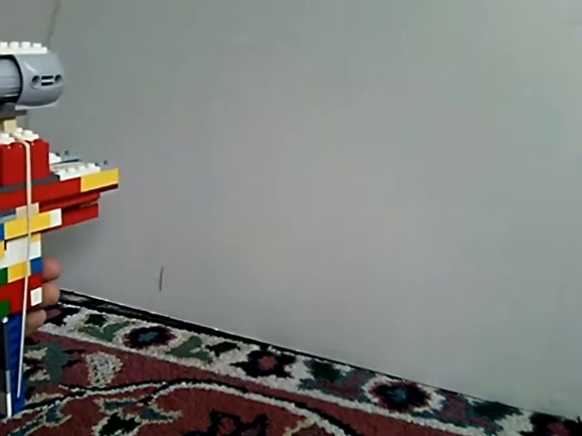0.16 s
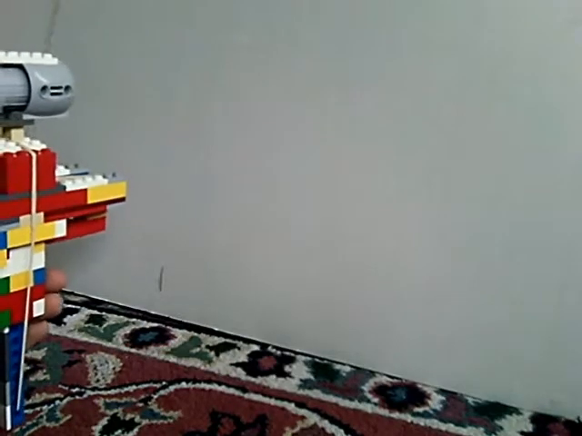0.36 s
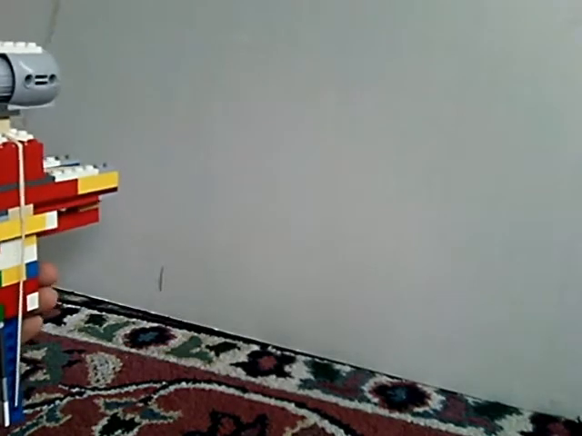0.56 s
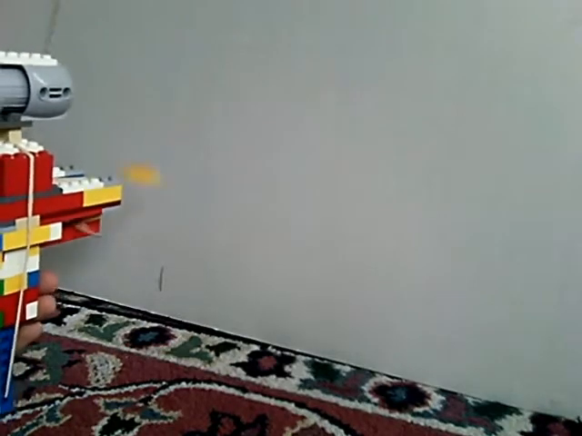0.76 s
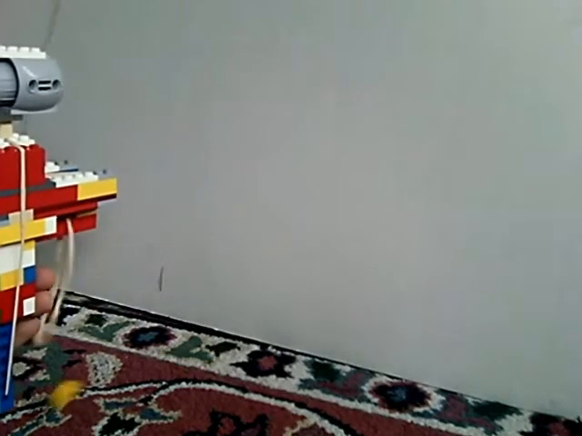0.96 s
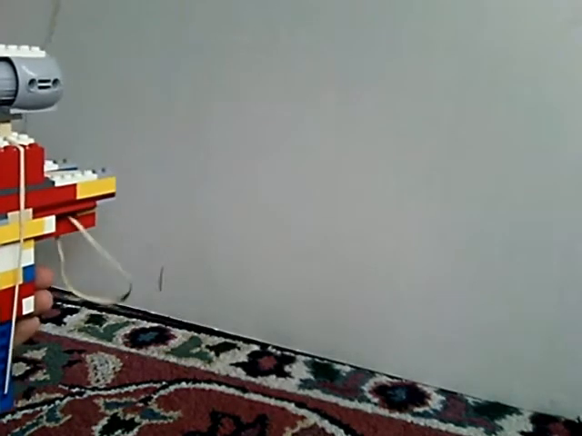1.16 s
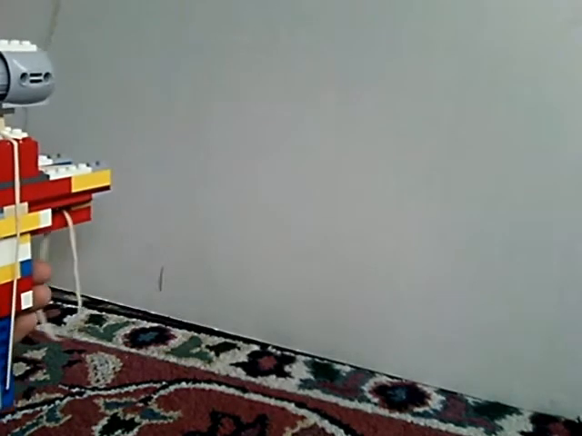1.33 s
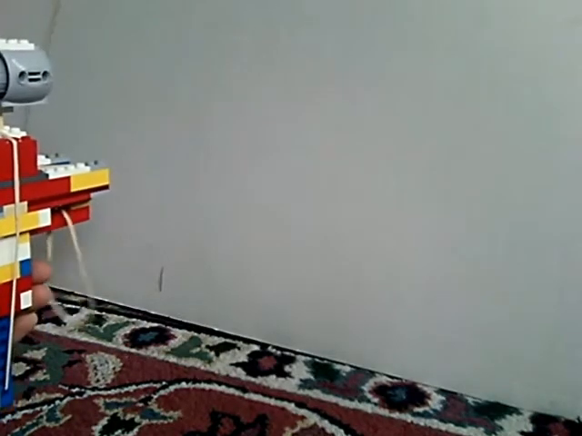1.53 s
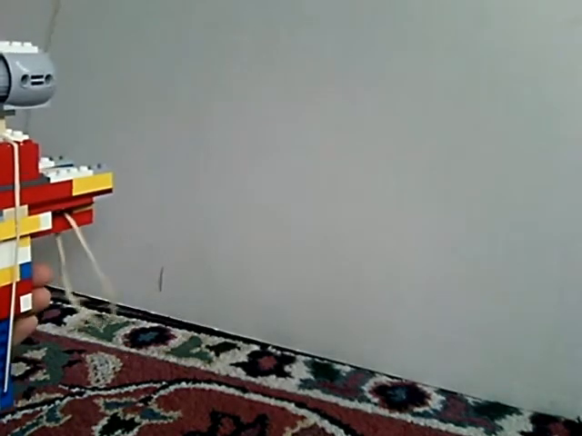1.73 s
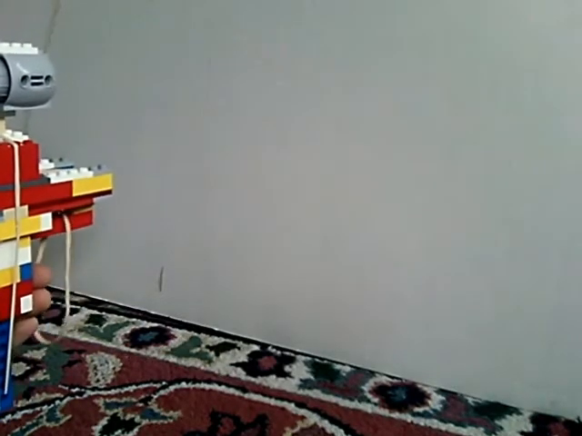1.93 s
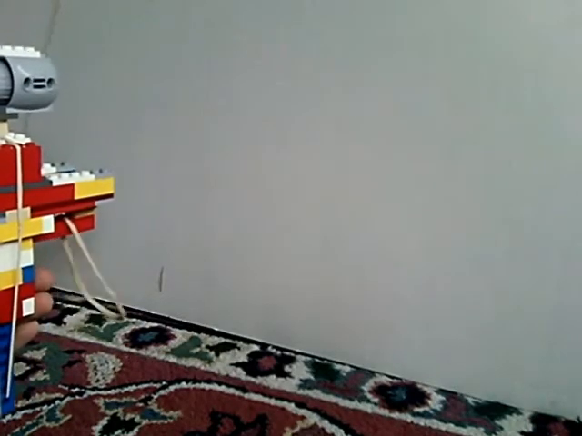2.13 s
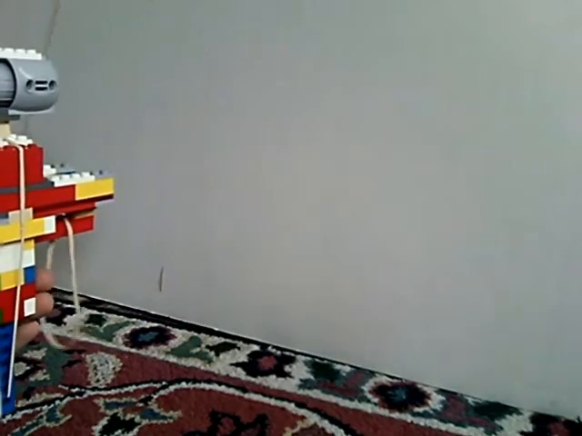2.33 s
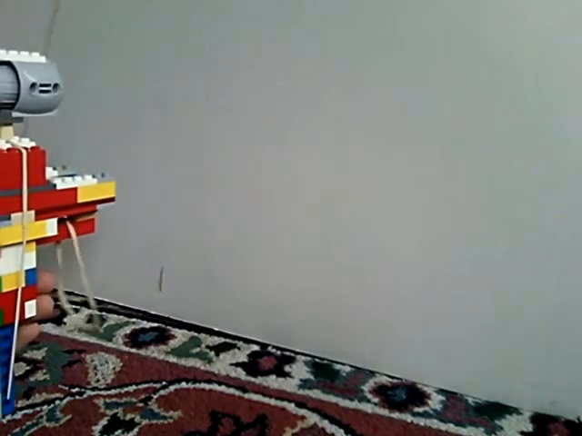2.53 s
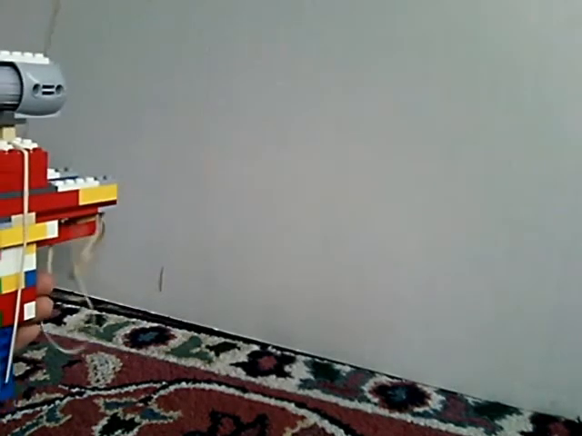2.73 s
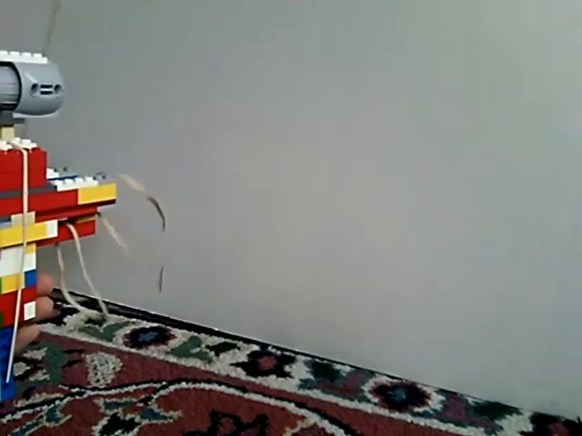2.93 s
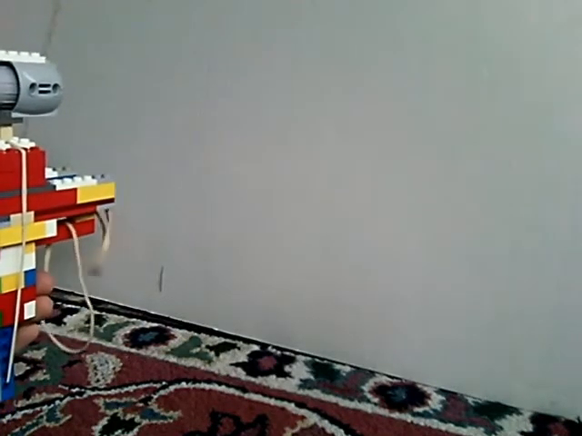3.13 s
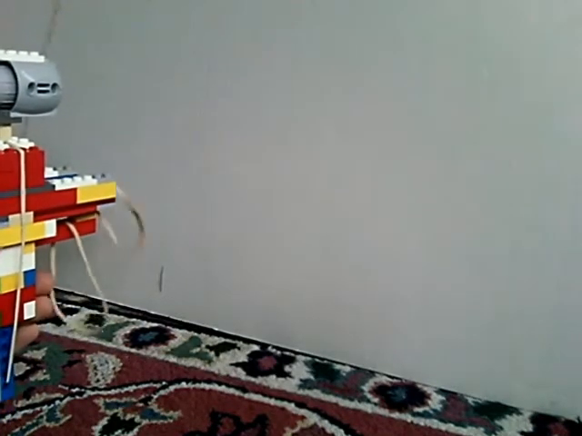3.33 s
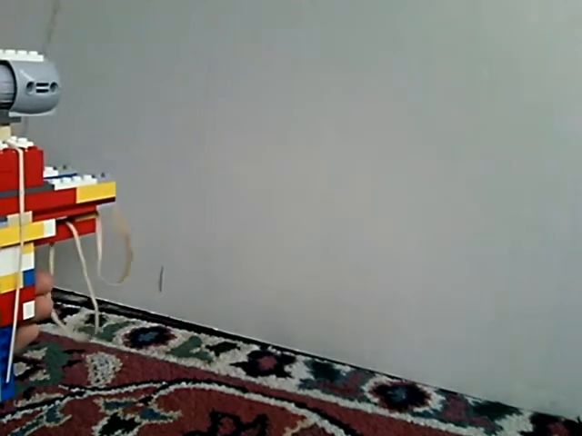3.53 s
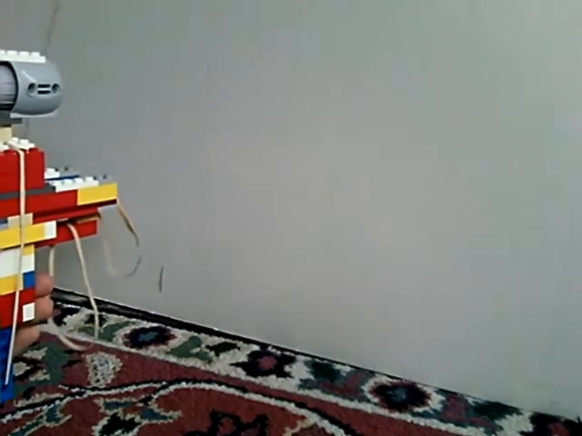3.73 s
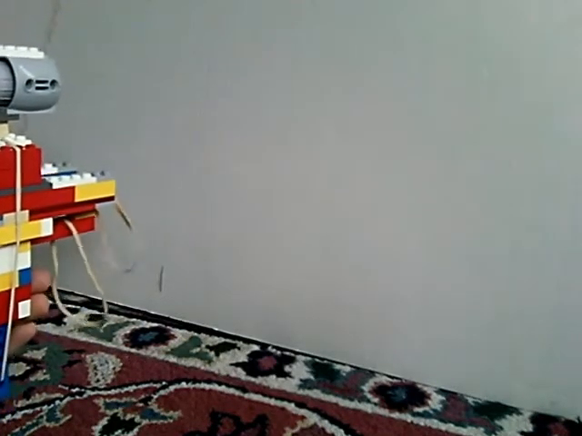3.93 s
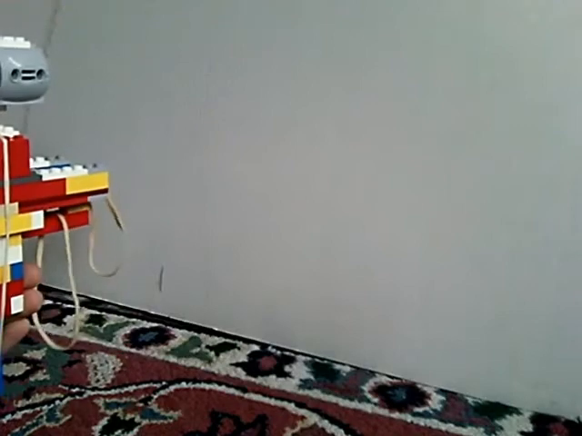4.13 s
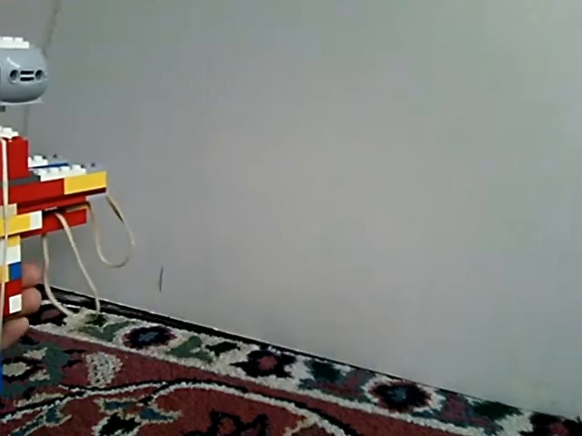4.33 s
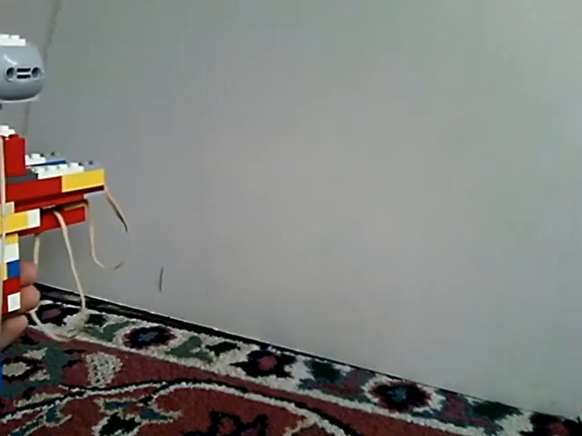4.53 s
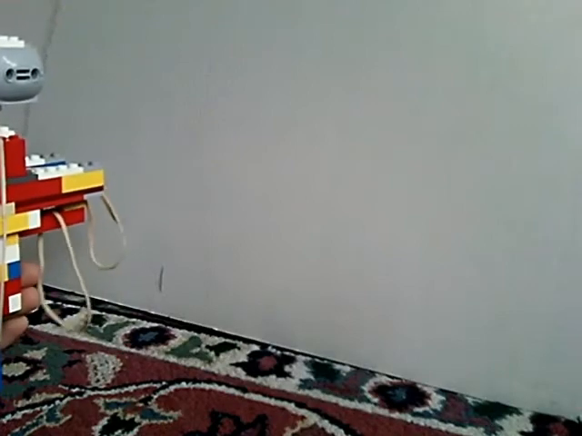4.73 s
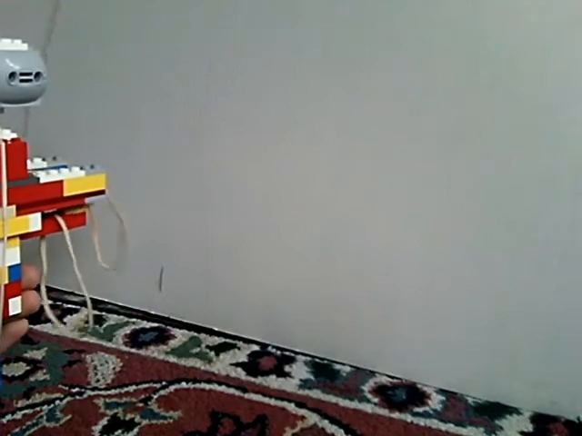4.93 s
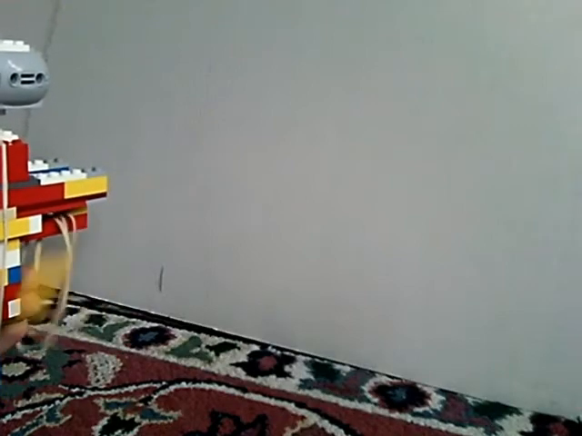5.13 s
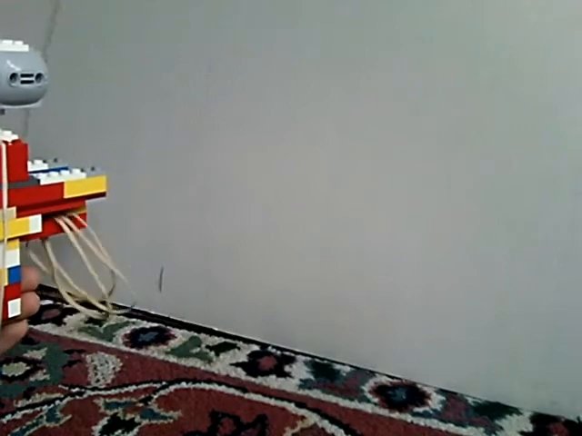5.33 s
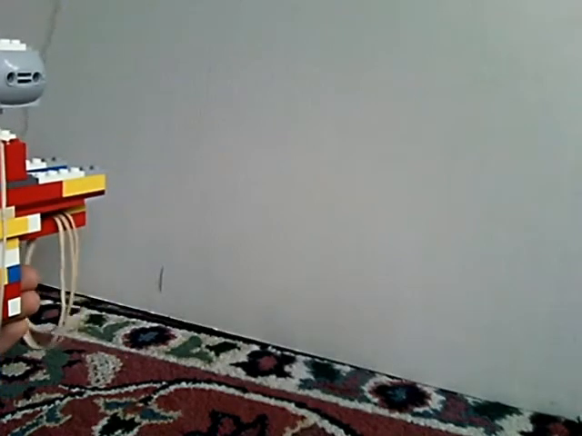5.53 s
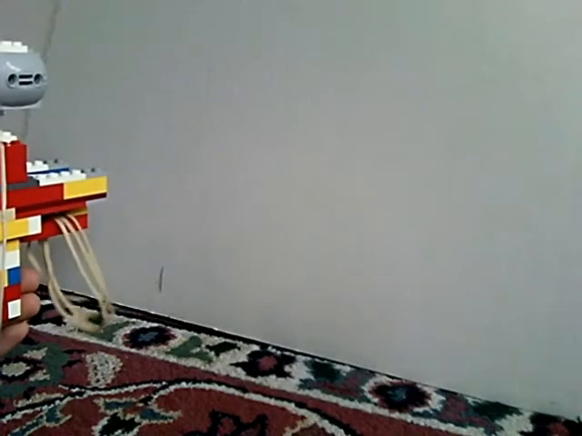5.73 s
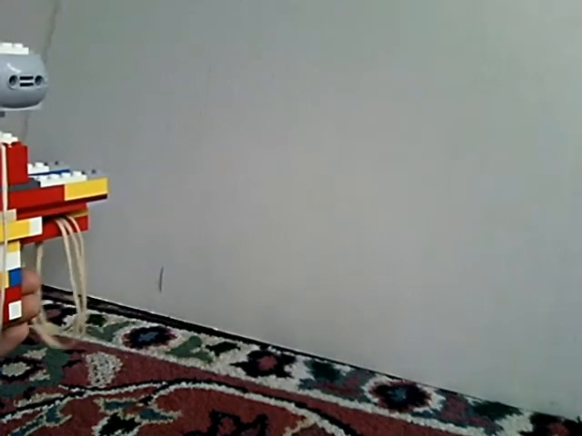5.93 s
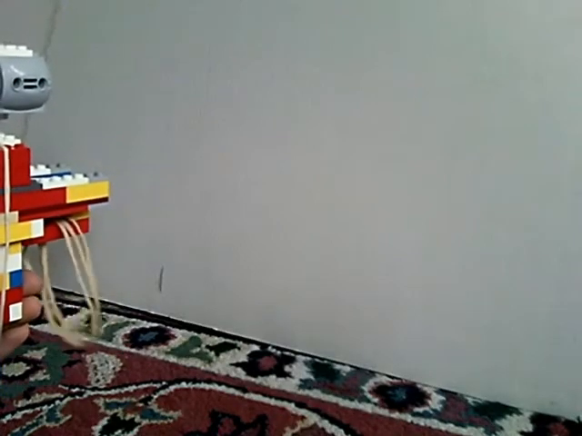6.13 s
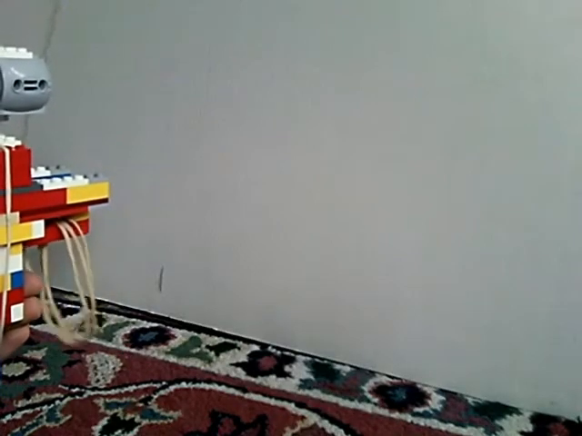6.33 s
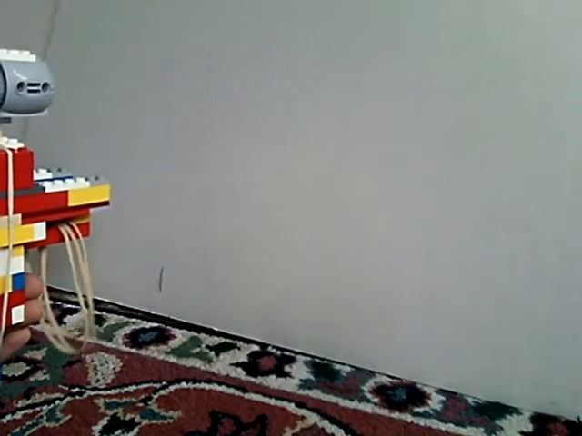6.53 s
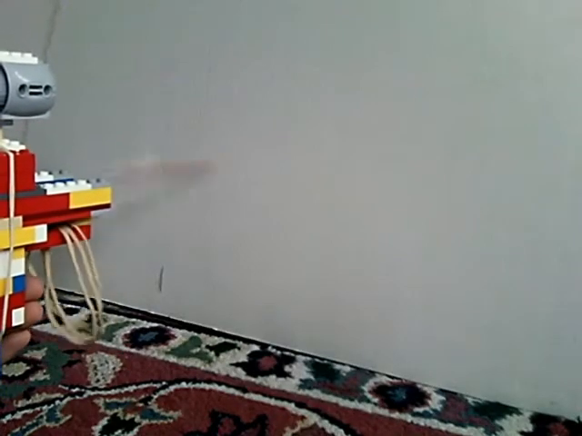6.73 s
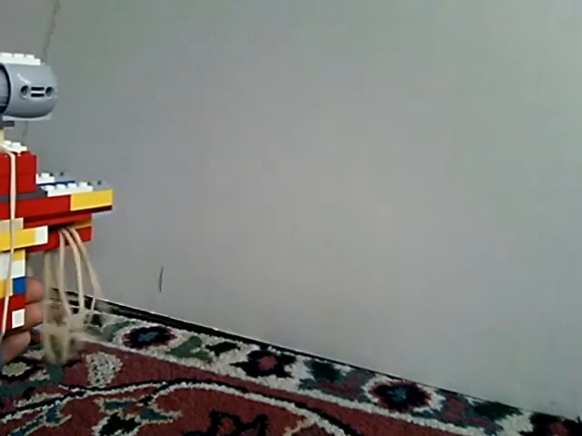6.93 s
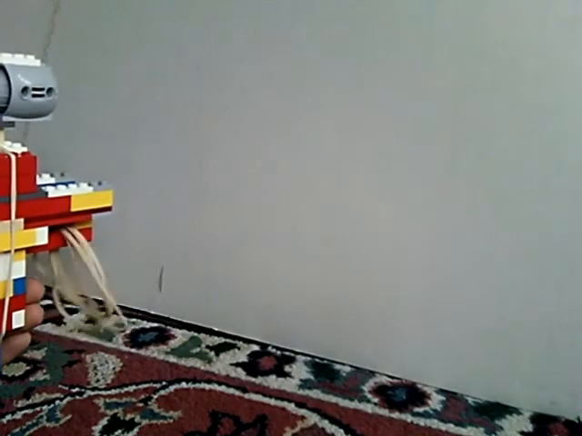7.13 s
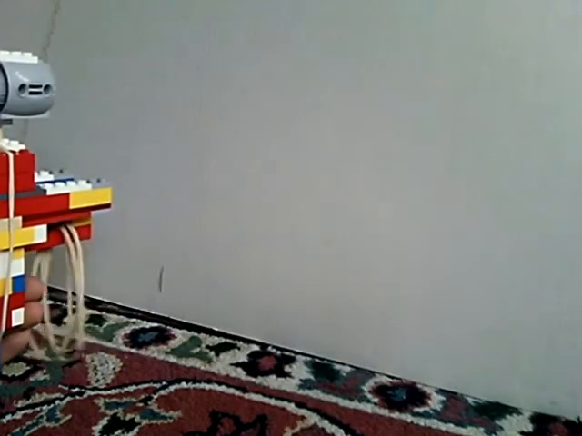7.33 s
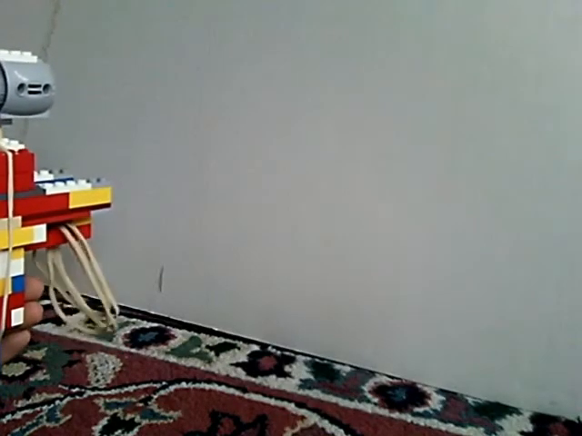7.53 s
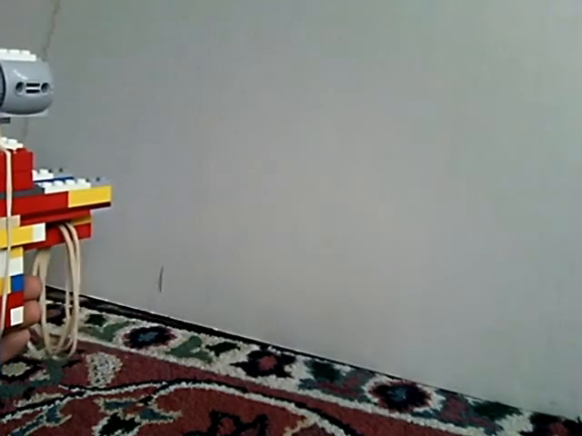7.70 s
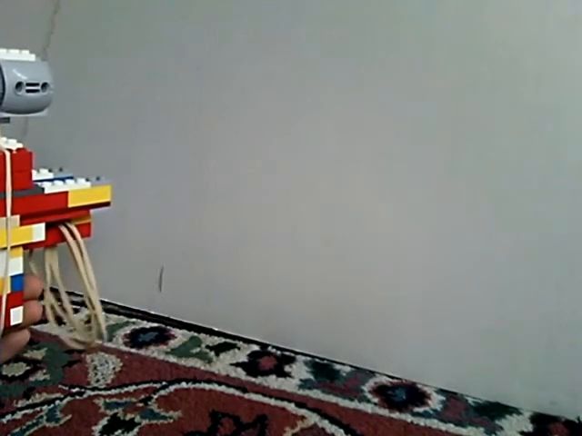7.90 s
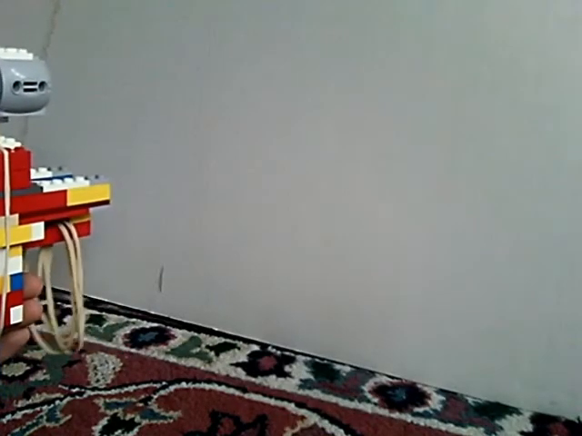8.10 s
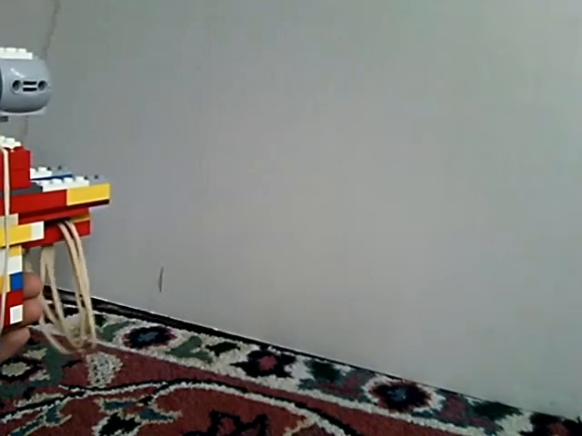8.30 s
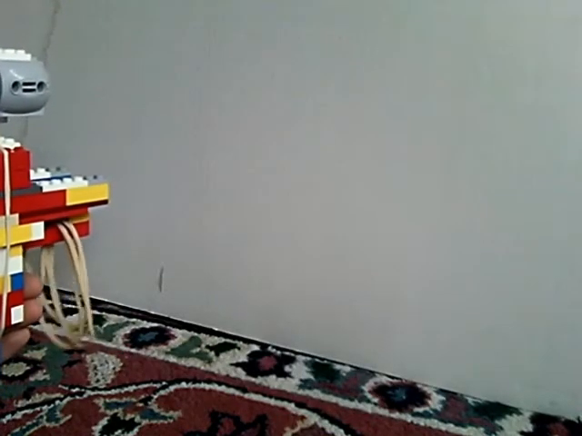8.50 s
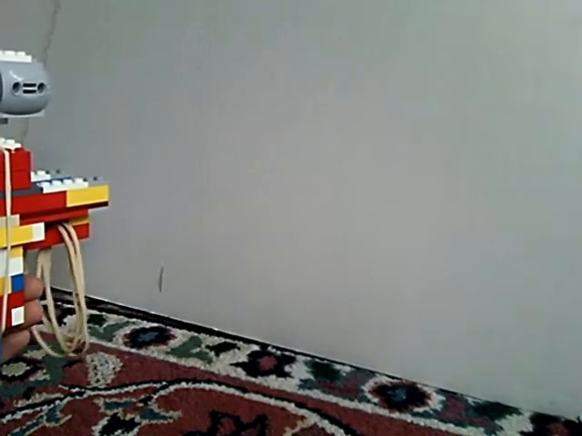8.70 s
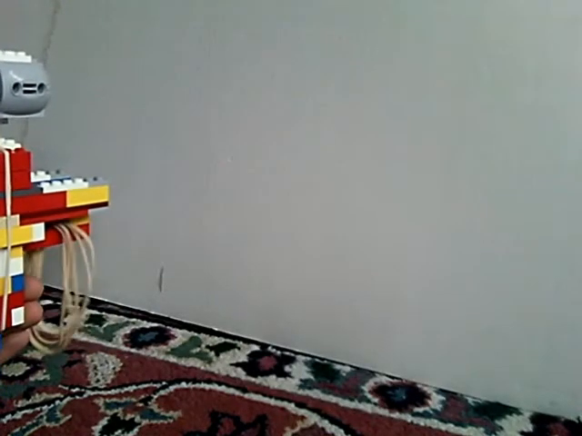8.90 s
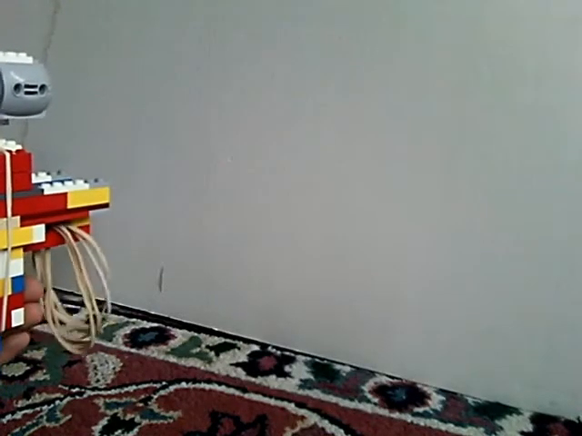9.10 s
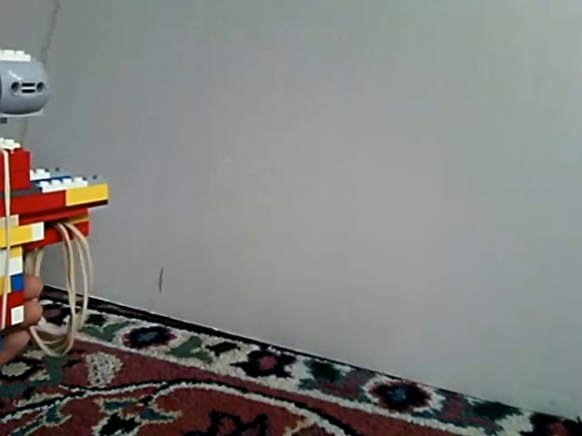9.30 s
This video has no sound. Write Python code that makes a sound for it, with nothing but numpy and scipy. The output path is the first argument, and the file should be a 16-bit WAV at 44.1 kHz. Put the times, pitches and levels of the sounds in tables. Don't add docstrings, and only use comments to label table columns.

```python
import sys
import numpy as np
from scipy import signal
from scipy.fft import rfft, irfft
from scipy.io import wavfile
from scipy.ndimage import uniform_filter1d

SR = 44100
rng = np.random.default_rng(int(sys.argv[2]) if len(sys.argv) > 2 else 0)


def boost(x):
    u = np.asarray(x, float) / 20
    return 10 ** u


def dump_mix(stems):
    frames = np.atleast_2d(stems).T
    limited = np.clip(frames, -1, 1)
    pcm = np.round(limited * 32767).astype(np.int16)
    wavfile.write(sys.argv[1], SR, pcm)


N = 417186

# frequency in Hz, level in dB, decay time t60 in seconds.
GUN_MODES = [(690, -16.5, 0.0086), (957, -20, 0.0059), (1406, -16, 0.012), (1680, -10, 0.0051),
             (2100, -3, 0.0049), (2756, -3.5, 0.0038), (3440, -2, 0.0023), (4200, -4.5, 0.0026),
             (5340, -9, 0.0033), (6160, -9, 0.0028), (7900, -11, 0.0028), (9920, -11.5, 0.0019)]
# release in seconds, strength in dB,
# time to the muzzle in seconds, whip of the band in dB.
SHOTS = [
    (0.6353, -1, .0203, -0.5),
    (2.505, -0.5, 0.016, -2),
    (4.883, -1, .0203, 1.5),
    (6.675, -1.5, .02, -3),
    (8.641, -3, 0.021, -6),
]
# delay as a share of the time to the muzzle, level in dB, # added ring in
# Hz, chatter t60 in seconds.
SHOT_STEPS = [
    (-.18, -9, 2020, 0.06),
    (0, 0, 2280, 0.031),
    (0.279, -7, 3940, 0.079),
    (.5, -2, 4200, 0.039),
    (0.752, -10.5, 3220, 0.0097),
    (1., -2, 2770, 0.035),
    (1.2, -4, 2130, 0.027),
    (1.599, -5, 2440, 0.012),
    (1.9, -3.5, 3910, .03),
    (2.4, -16, 3250, 0.064),
]


def barrel_rattle():
    share, db, hz, t60 = np.transpose(SHOT_STEPS)
    luck_db = 3.5 * rng.standard_normal((len(SHOTS), len(share)))
    rows = []
    for (s, strength_db, barrel_s, whip_db), luck in zip(SHOTS, luck_db):
        whip = whip_db * (share > 1.4)
        rows += unfold(s, share * barrel_s, db + strength_db + whip + luck, hz, t60)
    return boost(-3.0) * plastic_clicks(rows, GUN_MODES, -6.5, 0.0064, cut_hz=910)


# frequency in Hz, level in dB, t60 in seconds.
WALL_MODES = [(172.7, -15, 0.19), (231.4, -15, 0.11), (318.3, -6.5, 0.11), (386.5, -2, 0.065),
              (407, 1, 0.024), (507, -3.5, 0.093), (564.2, -9, 0.081), (646, 5, 0.016),
              (732.7, -4.5, 0.082), (740, 4.5, 0.031), (793, 4, 0.02), (957, -7, 0.011), (1028, 0, 0.035),
              (1124, -10.5, 0.16), (1251, -11, 0.069), (1453, -3, 0.031), (1700, -10, 0.024),
              (1900, -3, 0.029), (2350, -1.5, 0.016), (3050, -11, 0.005)]
# frequency in Hz, level in dB, t60 in seconds.
BRICK_MODES = [(290, -20.5, 0.067), (616, -20, 0.052), (900, -7, 0.0067), (1546, -10.5, 0.023),
               (1900, -2, 0.0078), (2610, -8, 0.01), (3130, -6.5, 0.0037), (4530, -10.5, 0.005),
               (6030, -13, 0.0054), (6900, -14.5, 0.0024), (9300, -14.5, 0.0018)]
# start in seconds, peak in dB, crack in dB, push of air in dB,
# second touch in dB.
THUMPS = [
    (0.7548, 1, -6, -35, -27),
    (2.5387, 10.5, -5, -2.5, 0),
    (4.9524, 4.5, -1, -19, -8),
    (6.7092, 10, 0, 0, 3),
    (8.671, 8, 0, 1, 4),
]


def wall_thumps():
    boom, crack, push = np.zeros((2, N)), np.zeros((2, N)), np.zeros(N)
    hard_db, hard_t60, chatter_per_db = 9.5, 0.0076, 0.9
    middle_hz, dull_db_per_octave = 627, 1.1
    for s, db, crack_db, push_db, second_db in THUMPS:
        soft_db = max(hard_db - db, 0)
        dulling = dull_db_per_octave * soft_db
        modes = [(hz, d - dulling * abs(np.log2(hz / middle_hz)), t60) for hz, d, t60 in WALL_MODES]
        chatter_t60 = hard_t60 * boost(-chatter_per_db * soft_db)
        strike(*boom, s, modes, db, chatter_t60, detune=0.011, spread_db=1, blur=0.23)
        strike(*crack, s, BRICK_MODES, crack_db, 0.0079)
        second_s = s + .0142
        strike(*boom, second_s, modes, second_db, 0.016, detune=0.011, spread_db=-0.5, blur=0.17)
        strike(*crack, second_s, BRICK_MODES, second_db + 0.5 - 2 * soft_db, 0.0065)
        add(push, s, boost(push_db) * ring([(19.4, 0.96, 0.15)]))
    return low_cut(low_cut(boom, 122), 122), crack, push


# start in seconds, strength in dB, loudest ring in Hz.
TRIGGER_SNAPS = [
    (1.6254, -5, 2282),
    (3.9929, -6.5, 2205),
    (5.7302, -6, 2210),
    (7.9217, -7, 2100),
]
# delay in seconds, level in dB, share of the ring frequency,
# chatter t60 in seconds.
TRIGGER_STEPS = [
    (-.006, -31, 0.78, .03),
    (-.003, -11, 1.034, 0.09),
    (0, 0, 1., .018),
    (.0036, -2, 0.933, 0.0094),
]


def trigger_snaps():
    delay, db, share, t60 = np.transpose(TRIGGER_STEPS)
    rows = []
    for s, strength_db, hz in TRIGGER_SNAPS:
        rows += unfold(s, delay, db + strength_db, share * hz, t60)
    snaps = plastic_clicks(rows, GUN_MODES, -1.056, 0.007, cut_hz=520)
    return boost(3.5) * signal.lfilter(*signal.butter(1, 6000, fs=SR), snaps)


# start in seconds, peak in dB, loudest ring in Hz, chatter t60 in seconds.
BOUNCES = [(5.1825, -29, 1820, .01), (5.185, 3, 1430, 0.019), (5.188, -4, 1900, 0.012),
           (5.194, -7, 700, 0.021), (5.2, -9.5, 2270, 0.023), (5.2365, -2, 1470, 0.013),
           (5.24, -5.5, 1900, 0.01), (5.2445, -10, 900, 0.026), (5.25, -20, 2600, 0.015),
           (5.298, -34, 300, 0.01)]


def near_bounces():
    return plastic_clicks(BOUNCES, BRICK_MODES, -2.5, 0.015, cut_hz=44)


# start in seconds, peak in dB, loudest ring in Hz,
# chatter t60 in seconds.
LANDINGS = [
    (3.0865, -16, 3190, 0.031),
    (3.09, -15.5, 1760, 0.012),
    (3.104, -23.5, 1610, .01),
    (7.34, -13, 3127, 0.019),
    (7.343, -15, 2060, 0.0039),
    (7.355, -22, 4070, 0.057),
]


def far_landings():
    return plastic_clicks(LANDINGS, BRICK_MODES, 0, 0.0092, cut_hz=700)


# start in seconds, peak in dB, ring in Hz, t60 in seconds.
KNOCKS = [(3.196, -27.5, 320, .04), (3.216, -34, 230, 0.036), (4.135, -42, 560, 0.055),
          (5.19, -27.5, 120, .06), (1.702, -40, 170, .03), (5.4168, -34.5, 520, 0.016),
          (9.198, -30, 250, 0.045), (9.197, -35, 830, .015)]


def knocks_and_jolts():
    out = np.zeros((2, N))
    taps = list(KNOCKS)
    for s, db, barrel_s, _ in SHOTS:
        for late in (0, barrel_s):
            taps.append((s + late, db - 26, 384, 0.044))
    for s, db, hz, t60 in taps:
        strike(*out, s, [(hz, 0, t60), (2.0 * hz, -9, t60 / 2)], db, 0.0057, detune=0)
    return out


# start in seconds, length in seconds,
# centre in Hz, width in Hz, level in dB.
HOLLOWS = [(5.195, .045, 1520, 80, -37), (5.245, 0.08, 1545, 44, -30.5), (5.74, 0.079, 1400, 60, -44),
           (1.645, 0.069, 1350, 110, -46), (5.745, .05, 3300, 150, -41), (4.005, .068, 1347, 100, -45),
           (3.1, .07, 3250, 150, -48)]
# start in seconds, length in seconds, centre in Hz,
# width in Hz, level in dB.
RUBS = [(1.09, .11, 2500, 1000, -56), (3.3, 0.46, 1950, 1200, -61), (9.1, 0.54, 1620, 220, -56.5),
        (.12, 0.21, 900, 1000, -57.5)]


def rubs_and_hollows():
    out = np.zeros(N)
    for s, length, hz, width_hz, db in list(RUBS) + list(HOLLOWS):
        size = round(length * SR)
        add(out, s, boost(db) * fuzz(hz, width_hz, size) * signal.windows.tukey(size, .5))
    return out


def outside():
    t = np.arange(N) / SR
    hum_hz, hum_db = 121, -55.5
    rumble_db = -45.5 + 15 * np.exp(-t / 0.18) - 1.65 * t
    drift_db = 3 * fuzz(0.23, 1.7, N)
    rumble = boost(rumble_db + drift_db) * fuzz(23.6, 21, N)
    near = 1 / (1 + np.exp(np.minimum((t - 0.45) / 0.076, 50)))
    drone = boost(hum_db + 16) * near * np.sin(2 * np.pi * hum_hz * t)
    hums = boost(hum_db) * fuzz(hum_hz, 3.6, N) + boost(-58.5) * fuzz(177.9, 3.6, N)
    return rumble + drone + hums


# frequency in Hz, density in dB per Hz.
FLOOR_SPECTRUM = [(12, -30), (20, -2), (124, -4), (141, -30), (174, -1), (204, -18.5), (233, -6.5),
                  (312, -15), (355, -11), (395, -14.5), (557, -15), (706, -18), (1400, -21), (2080, -28),
                  (11000, -34), (14300, -15.5), (22000, -120)]


def noise_floor():
    frames, hz = N // 512 + 5, np.fft.rfftfreq(2048, 1 / SR)
    a, b, patches = rng.standard_normal((frames, 1025, 3)).T
    patches = evened(uniform_filter1d(uniform_filter1d(patches, 10, 0), 8, 1))
    z = (a + 1j * b) * boost(read(FLOOR_SPECTRUM, hz)[:, None] + 1.7 * patches)
    return boost(-43) * evened(signal.istft(z, nperseg=2048, noverlap=1536)[1][:N])


# frequency in Hz, t60 in seconds.
ROOM_DECAY = [(150, 0.27), (500, 0.35), (1400, 0.35), (3500, 0.27), (6000, 0.26), (9000, 0.14)]


def room(x, far_s=0.064, far_db=-6):
    taps = np.zeros(SR // 2)
    at = np.arange(200, len(taps) - 20, 20)
    taps[at + rng.integers(0, 20, len(at))] = rng.choice([-1., 1.], len(at))
    hz, t, z = signal.stft(taps, SR, nperseg=256)
    thinning_db = far_db * np.clip((t - far_s) / 0.015, 0, 1)
    decay_db = -60 * t / read(ROOM_DECAY, hz)[:, None]
    tail = signal.istft(z * boost(decay_db + thinning_db), SR, nperseg=256)[1]
    return signal.fftconvolve(x, tail / np.linalg.norm(tail))[:N]


def unfold(start, delays, db, hz, chatter_t60):
    return list(zip(start + delays, db, hz, chatter_t60))


def plastic_clicks(table, modes, main_db, main_t60, cut_hz):
    out = np.zeros((2, N))
    for s, db, hz, chatter_t60 in table:
        body = sorted(list(modes) + [(hz, main_db, main_t60)])
        strike(*out, s - .0004, body, db, chatter_t60)
    return low_cut(out, cut_hz)


def strike(direct, spread, s, modes, db, chatter_t60, detune=0.046, spread_db=2, blur=0.5):
    luck = rng.standard_normal((len(modes), 2))
    body = ring([(hz * (1 + detune * a), d + spread_db * b, t60)
                 for (hz, d, t60), (a, b) in zip(modes, luck)])
    sound = signal.fftconvolve(spray(chatter_t60), body)
    sound *= boost(db) / abs(sound).max()
    mean = ring([(hz, d, blur * t60) for hz, d, t60 in modes])
    add(direct, s - 128 / SR, sound)
    add(spread, s, mean * np.linalg.norm(sound) / np.linalg.norm(mean))


def spray(chatter_t60, grain_db=3, rise_s=0.00041):
    t = np.arange(2048) / SR
    contacts = rng.standard_normal(len(t)) * boost(grain_db * rng.exponential(1, len(t)))
    contacts *= boost(-60 * t / max(chatter_t60, .001)) * (1 - np.exp(-t / rise_s))
    z = rfft(np.roll(contacts, 128))
    return irfft(z / np.sqrt(uniform_filter1d(abs(z) ** 2, size=13)))


def ring(modes):
    t = np.arange(round(1.2 * max(m[2] for m in modes) * SR) + 64) / SR
    return sum((-1) ** k * boost(db - 60 * t / max(t60, .002)) * np.sin(2 * np.pi * hz * t)
               for k, (hz, db, t60) in enumerate(modes))


def low_cut(x, hz):
    return signal.sosfilt(signal.butter(2, hz, "high", fs=SR, output="sos"), x)


def fuzz(hz, width_hz, size):
    f = np.fft.rfftfreq(size, 1 / SR)
    band = 1 / (1 + ((f - hz) / width_hz * 2) ** 2)
    return evened(irfft(rfft(rng.standard_normal(size)) * band, size))


def evened(x):
    return x / np.sqrt(np.mean(x ** 2) + 1e-20)


def read(points, hz):
    f, value = np.transpose(points)
    return np.interp(np.log(hz + 1), np.log(f + 1), value)


def add(mix, s, sound):
    part = mix[round(s * SR):][:len(sound)]
    part += sound[:len(part)]


def scene():
    rattle = barrel_rattle()
    boom, crack, push = wall_thumps()
    trigger = trigger_snaps()
    near = near_bounces()
    far = far_landings()
    taps = knocks_and_jolts()
    wet = room(boost(-8.5) * rattle[1] + boost(-11.5) * trigger[1])
    wet += room(boost(-12) * near[1], far_s=0.067, far_db=-11)
    wet += room(boost(-5.5) * far[1], far_s=0.082, far_db=-1.5)
    thumps = boost(-12.0) * boom[1] + boost(-12) * crack[1] + boost(-5.5) * taps[1]
    wet += room(thumps, far_s=0.21, far_db=-1)
    direct = (rattle + trigger + near + far + boom + crack + taps)[0] + push
    return (direct + wet + noise_floor() + outside() + rubs_and_hollows())[None]


def band_limit(x):
    return signal.sosfilt(signal.butter(12, 15660, fs=SR, output="sos"), x)


def record(dry):
    clipped = np.clip(dry, -.62, .45)
    clipped += .08 * np.tanh(.7 * (dry - clipped))
    sagged = signal.lfilter([1, -1], [1, -np.exp(-2 * np.pi * 6 / SR)], clipped)
    limited = np.clip(sagged, -.5, .5)
    band = signal.firwin(191, 11050, window=("kaiser", 5), fs=SR)
    narrow = signal.oaconvolve(limited, band[None], "same")
    overload = uniform_filter1d(1. * (abs(dry) > .75), size=300)
    spill = signal.sosfilt(signal.butter(6, 12000, fs=SR, output="sos"), overload * (limited - narrow))
    mix = narrow + boost(5) * spill
    return band_limit(mix)


dry = scene()
out = record(dry)
dump_mix(out)
```